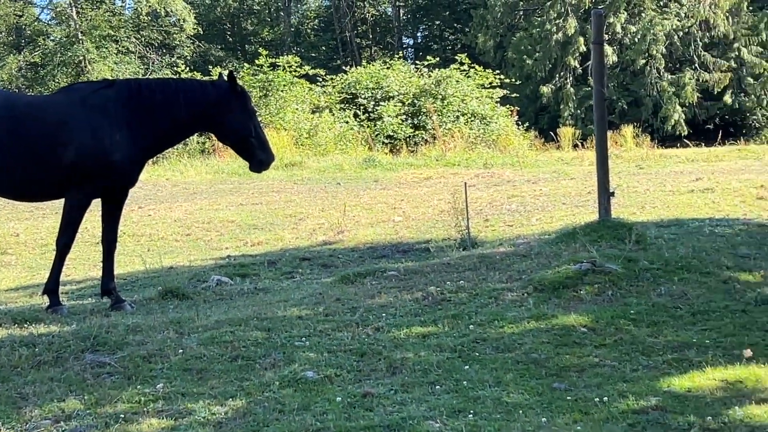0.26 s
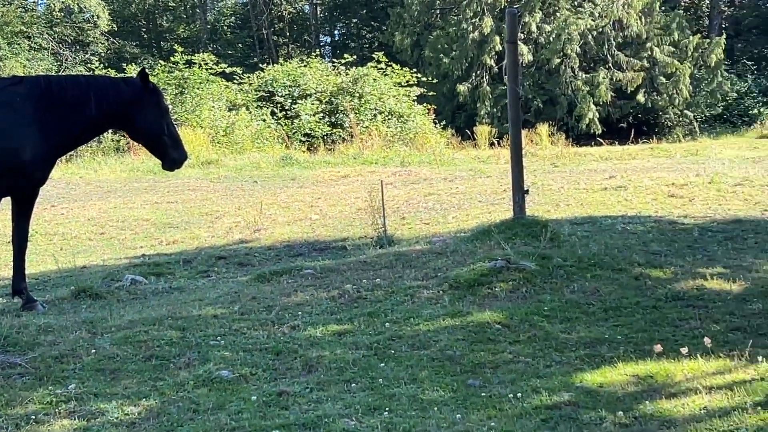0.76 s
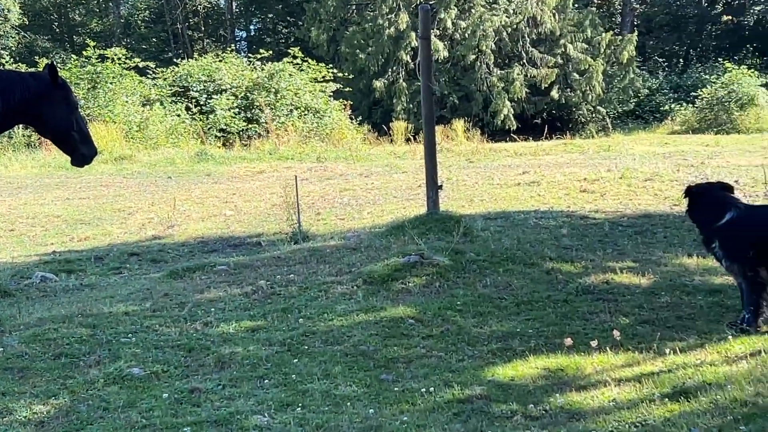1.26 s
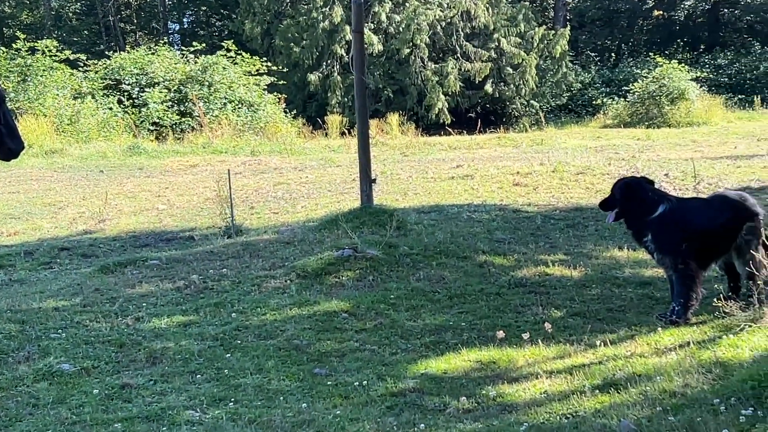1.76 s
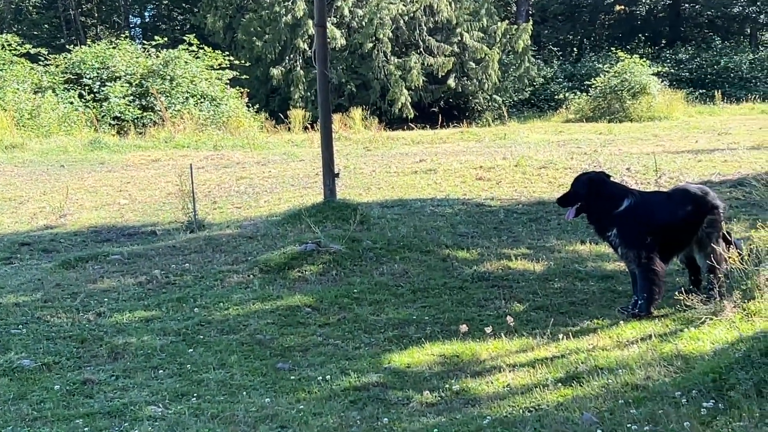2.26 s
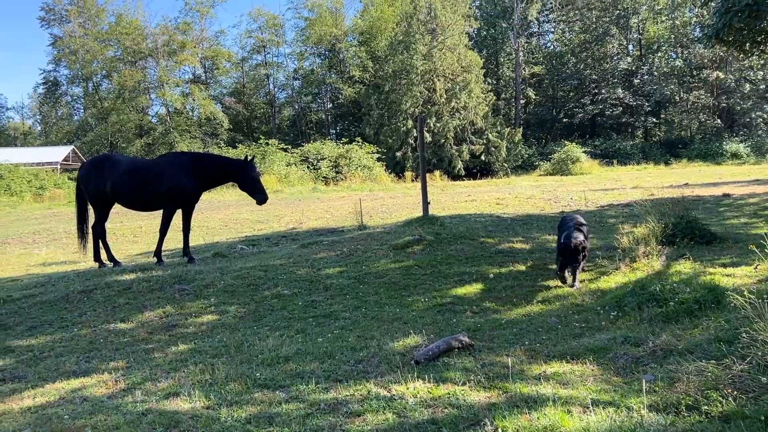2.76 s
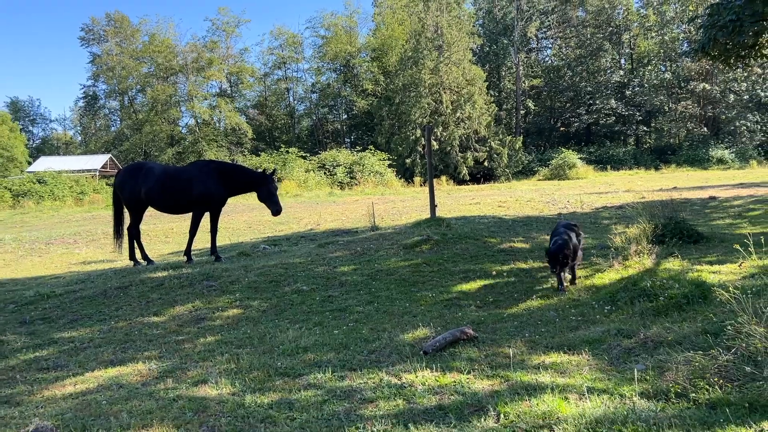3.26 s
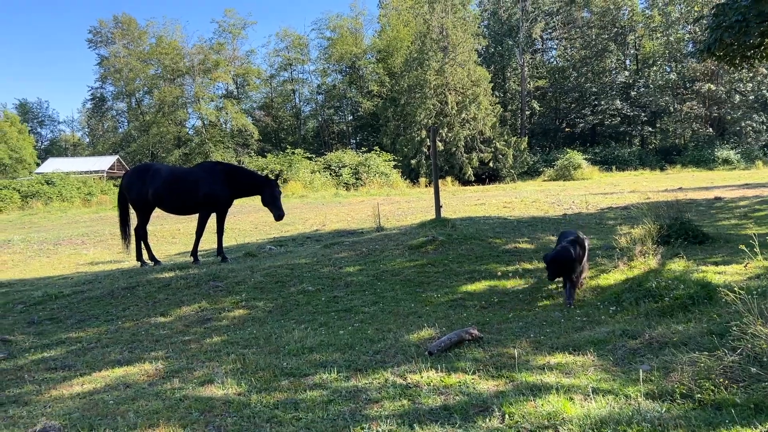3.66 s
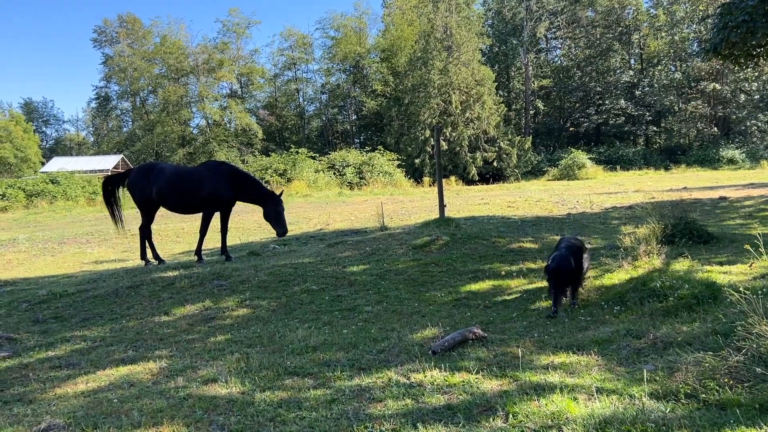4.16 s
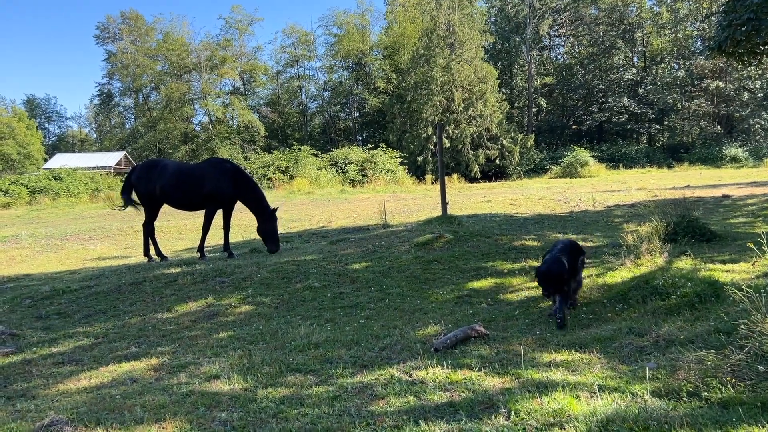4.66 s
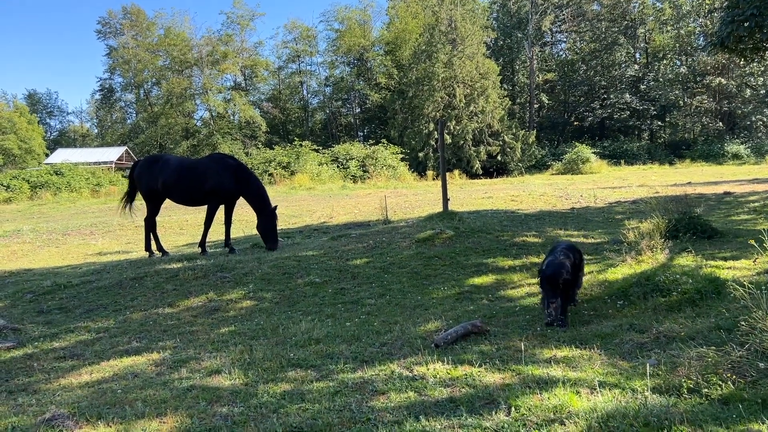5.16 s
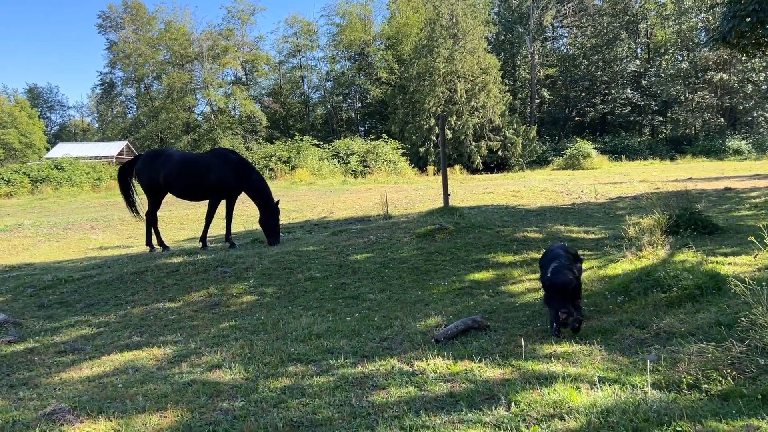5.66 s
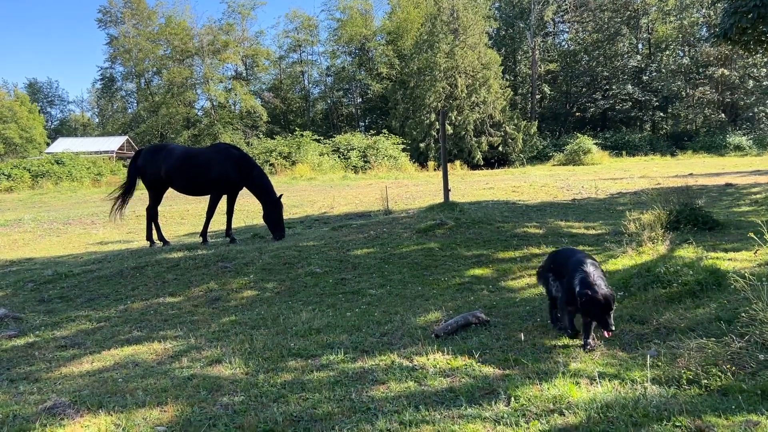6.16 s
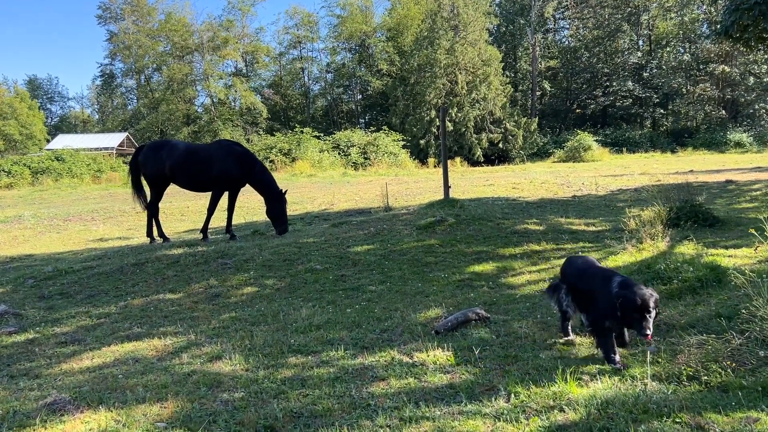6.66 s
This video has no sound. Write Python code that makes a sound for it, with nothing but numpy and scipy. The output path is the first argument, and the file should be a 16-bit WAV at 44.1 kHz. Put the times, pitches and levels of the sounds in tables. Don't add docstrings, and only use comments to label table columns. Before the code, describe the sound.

Steady low traffic rumble dominates a calm field, under thin airy hiss from leaves. Faint bird notes come and go among the trees, lightly echoing. Two or three muffled ground thumps fall near two seconds, stopping with a small click as the scene changes. Faint grass rustles follow, then a clearer buzzing chirp at five seconds, another soft thud, and last a breathy, wet, flapping horse snort, much louder and closer.

```python
import sys
import numpy as np
from scipy import signal
from scipy.fft import rfft, irfft, next_fast_len
from scipy.io import wavfile
from scipy.ndimage import uniform_filter1d, map_coordinates

SR = 44100
rng = np.random.default_rng(int(sys.argv[2]) if len(sys.argv) > 2 else 0)


def invert_db(level):
    return 10 ** (np.asarray(level, dtype=float) / 20)


def output_pcm(signal):
    pcm = np.clip(np.atleast_2d(signal).T, -1, 1) * 32767
    wavfile.write(sys.argv[1], SR, np.round(pcm).astype(np.int16))


N = 303849
T = np.arange(N) / SR
SCENE_CHANGE = 102559
FLAP_HZ, FIRST_FLAP = 1 / .04215, 6.627 - 4 * .04215
# (time [s], length [s], centre [Hz], level [dB])
GRASS = [(.28, 0.064, 9000, -82), (1.01, 0.089, 12500, -79), (1.058, .03, 8000, -77),
         (3.01, .05, 12000, -84), (3.44, .04, 12000, -83), (3.627, .06, 13000, -80),
         (3.988, .06, 13000, -81), (3.11, 0.0068, 9800, -77), (0.036, .012, 950, -58),
         (4.5, .08, 12000, -84), (5.29, 0.074, 12800, -75), (5.883, .06, 12000, -82),
         (4.743, .03, 2300, -71.5), (5.018, 0.059, 2190, -70), (5.29, 0.072, 1790, -67),
         (5.576, 0.048, 2090, -73), (5.848, .03, 2500, -70), (6.107, 0.046, 1900, -72),
         (6.158, .006, 4100, -66), (6.203, 0.24, 11000, -85)]


def unit(x):
    return x / np.sqrt(np.mean(x ** 2) + 1e-20)


def along(points, hz):
    f, v = np.transpose(points)
    return np.interp(np.log(hz + 1), np.log(f + 1), v)


def curves(rows, at=T):
    s, *cols = np.transpose(rows)
    return [np.interp(at, s, c) for c in cols]


def wobble(rate, t=T):
    knots = rng.standard_normal(int(len(t) * rate / SR) + 4)
    return map_coordinates(knots, [(t - t[0]) * rate])


def filtered(x, response):
    m = next_fast_len(N + 8192)
    return irfft(rfft(x, m) * response(np.fft.rfftfreq(m, 1 / SR)), m)[..., :N]


def resonance(f, centre_hz, width_hz):
    return 1 / (1 + ((f - centre_hz) / width_hz * 2) ** 2)


def rush(mid_db, side_db, patchy_db, tie=0):
    z = signal.stft(rng.standard_normal((2, N)), nperseg=512)[2]
    field_noise = rng.standard_normal(z.shape[1:])
    patches = uniform_filter1d(uniform_filter1d(field_noise, 6, 0), 14, 1)
    z[1] = tie * z[0] + np.sqrt(max(1 - abs(tie) ** 2, 0)) * z[1]
    pair = signal.istft(z * invert_db(patchy_db * unit(patches)), nperseg=512)[1][:, :N]
    mid, side = filtered(pair, lambda hz: invert_db(np.array([mid_db(hz), side_db(hz)])))
    return np.array([mid + side, mid - side]) / np.std(mid)


def tone(hz):
    return 2 * np.pi * np.cumsum(hz) / SR


def window(start, length, t=T):
    return np.sqrt(np.sin(np.pi * np.clip((t - start) / length, 0, 1)).clip(0))


def field():
    # (time [s], level [dB])
    traffic = [(0, -48), (.3, -45), (1.05, -44), (1.9, -46.5), (2.25, -45), (2.76, -50), (3.24, -46.5),
               (3.69, -48), (4.2, -48), (5.06, -47.5), (5.33, -43.5), (5.7, -47.5), (6.18, -46),
               (6.5, -48.5)]
    # (time [s], level [dB])
    breeze = [(0, -81), (1, -81), (1.5, -82.5), (2.5, -84), (2.9, -82), (3.6, -75.5), (4.3, -77),
              (6.5, -75)]
    # (frequency [Hz], density [dB per Hz])
    rumble_spectrum = [(12, -48), (20, -20.5), (32, -12.5), (54, 2.5), (113, -6), (136, -13), (156, -16.5),
                       (188, -20), (320, -32.5), (420, -38), (700, -120)]
    # (frequency [Hz], density [dB per Hz])
    road_spectrum = [(88, -34), (150, -0.5), (233, -2.5), (326, -6), (362, -3.5), (660, -7), (939, 0),
                     (1170, -8.5), (1570, -11.5), (3080, -25.5), (3730, -28), (5000, -36), (6500, -75),
                     (11000, -120)]
    # (frequency [Hz], density [dB per Hz])
    leaves_mid = [(1760, -31), (3000, 3), (3130, 0.5), (3930, -4.5), (4360, -3), (5250, -3), (8110, -9),
                  (9380, -17), (9840, -15), (10100, -52), (10900, -17), (13600, -13.5), (15200, -22),
                  (15600, -36)]
    leaves_side = [(1760, -9), (3000, -3), (4210, -4), (4800, -4), (5140, -3.5), (7940, -10.5), (8110, -17),
                   (8690, -13), (10900, -15), (12600, -16), (13200, -29), (14000, -17), (14900, -21),
                   (15600, -19)]
    # (frequency [Hz], side minus mid [dB])
    field_side = [(30, -15), (60, -19), (110, -16), (200, -12.5), (380, -7), (700, -3.5), (1300, -4),
                  (3000, -2.5)]

    def wide(points):
        return lambda f: along(points, f), lambda f: along(points, f) + along(field_side, f)

    (rumble_db,), (leaves_db,) = curves(traffic), curves(breeze)
    road_db = -58.5 + .1 * (rumble_db - rumble_db.mean())
    stir = sum(np.exp(-((T - s) / .12) ** 2) for s, _, hz, _ in GRASS if hz > 7000)
    fizz_db = -89.5 + .2 * (leaves_db - leaves_db.mean()) + 2 * np.tanh(stir)
    rumble = invert_db(rumble_db + 2.5 + 2.1 * wobble(7)) * rush(*wide(rumble_spectrum), patchy_db=0)
    hum = rush(*wide(road_spectrum), patchy_db=0.96, tie=.45j)
    road = invert_db(road_db + 2 + 0.84 * wobble(3.24)) * hum
    hiss = rush(lambda f: along(leaves_mid, f), lambda f: along(leaves_side, f) + .6, patchy_db=1.55)
    high = filtered(hiss, lambda f: f > 10000)
    leaves = invert_db(leaves_db + 4 + 0.71 * wobble(12)) * (hiss - high)
    fizz = invert_db(fizz_db + 15 + 0.74 * wobble(12)) * high
    return rumble + road + leaves + fizz


def trees(x):
    t60 = 0.75
    t = T[:SR]
    tail = rng.standard_normal((2, SR)) * invert_db(-60 * t / t60) * np.clip(t / 0.064, 0, 1)
    return signal.fftconvolve(np.atleast_2d(x), tail / np.linalg.norm(tail[0]), axes=1)[:, :N]


def thuds():
    # (time [s], peak [dB], frequency signed by first swing [Hz], decay by 60 dB [s])
    blows = [(2.1208, -26.5, 111, 0.083), (2.1327, -26.5, -69, 0.26), (2.3108, -28.5, 83, 0.53),
             (6.12, -28, 102, 0.071)]
    out = np.zeros(N)
    for s, db, hz, t60 in blows:
        t = (T - s).clip(0)
        heard = (np.arange(N) <= SCENE_CHANGE) | (s * SR > SCENE_CHANGE)
        out += invert_db(db - 60 * t / t60) * np.sin(2 * np.pi * hz * t) * heard
    return filtered(out, lambda f: 1 / (1 + (f / 13500) ** 12))


def ground():
    out = np.zeros((2, N))
    both, each = rng.standard_normal(N), rng.standard_normal((2, N))
    sputter = invert_db(3.8 * wobble(300))
    for s, length, hz, db in GRASS:
        band = signal.butter(2, [hz * 0.71, hz * 1.18], "band", fs=SR)
        spread = hz / 6000
        noise = (both + each * spread) / np.hypot(1, spread)
        rustle = signal.lfilter(*band, noise * sputter * window(s, length))
        out += invert_db(db + 11.0) * np.sqrt(8000 / hz) * rustle
    return out


def buzzing(rows, beak_hz, above, below):
    carrier, buzz, db = curves(rows)
    beak = np.minimum(np.maximum.accumulate(carrier), beak_hz)
    comb = 0
    for k in range(-3, 5):
        line = carrier + k * buzz
        reach = np.where(line > beak, above, below)
        gain = np.exp(-((line - beak) / reach / buzz) ** 2) * invert_db(1.8 * wobble(40))
        comb = comb + gain * np.sin(tone(line + 26 * wobble(90)) + 1.1 * k * k)
    return invert_db(db) * (T > rows[0][0]) * (T < rows[-1][0]) * comb


def trills():
    # (time [s], length [s], level [dB], sweep [Hz])
    runs = [(0.268, .19, -67, 350), (2.442, .25, -73, 170)]
    out = np.zeros((2, N))
    turn = 88 * T % 1
    for s, length, db, sweep_hz in runs:
        progress = (T - s).clip(0, length) / length
        hz = 3200 + 170 * progress + sweep_hz * (2 * turn - 1)
        flutter = 3.7 * np.array([wobble(150), wobble(150)])
        pulses = window(s, length) * np.sqrt(np.sin(np.pi * turn).clip(0))
        out += invert_db(db + 8 - 5 * progress + flutter) * pulses * np.sin(tone(hz + 90 * wobble(300)))
    return out


def far_birds():
    # (time [s], carrier [Hz], buzz [Hz], level [dB])
    rival = [(3.748, 4260, 270, -80), (3.76, 4300, 265, -63), (3.8, 4420, 225, -64.5),
             (3.86, 4480, 205, -65.5), (3.94, 4650, 175, -71), (4.03, 4640, 170, -77),
             (4.2, 4600, 165, -86)]
    # (time [s], length [s], start [Hz], end [Hz], level [dB])
    glides = [(-.1, 0.36, 4730, 4600, -71.5), (1.079, 0.16, 4150, 4000, -81), (2.29, .035, 5100, 6000, -76),
              (2.35, .079, 7000, 6900, -79), (3.22, .7, 6930, 6830, -83), (3.498, 0.044, 7300, 7900, -78)]
    # (time [s], length [s], start [Hz], end [Hz], level [dB])
    seep = [
        (2.762, 0.18, 6160, 6190, -86),
        (2.92, .19, 6150, 6000, -89.5),
    ]
    # (time [s], length [s], start [Hz], end [Hz], level [dB])
    double = [(0, .05, 4380, 4050, 0), (.04, .065, 4250, 3850, -3)]
    # (time [s], level [dB])
    chips = [(3.11, -74), (3.2, -75), (3.29, -74), (3.375, -71), (3.46, -74), (3.555, -72), (3.65, -79)]
    note_spread = 117
    notes = [(*row, 270) for row in glides] + [(*row, 22) for row in seep]
    notes += [(s, .03, 4080, 4400, db, note_spread) for s, db in chips]
    for k in range(4):
        for s, *glide, db in double:
            notes.append((.514 + k * .147 + s, *glide, -68 + db - k * 1.5, note_spread))
    out = buzzing(rival, beak_hz=4560, above=.95, below=1.05) * invert_db(np.array([[2.6], [-2.6]]))
    for s, length, start_hz, end_hz, db, spread in notes:
        span = slice(max(round(s * SR), 0), round((s + length) * SR))
        t = T[span]
        phase = tone(np.interp(t, [s, s + length], [start_hz, end_hz]))
        for ear in out:
            blur = 45 / spread + wobble(3.5 * spread, t)
            ear[span] += invert_db(db + 5) * window(s, length, t) * blur * np.sin(phase)
    return out + trills()


def near_bird():
    # (time [s], carrier [Hz], buzz [Hz], level [dB])
    buzz_call = [(5.035, 3350, 149, -66), (5.05, 3600, 148, -56), (5.068, 3975, 149.4, -47.5),
                 (5.14, 4056, 158.8, -48), (5.22, 3950, 155.6, -46.5), (5.3, 3875, 143.2, -51.5),
                 (5.4, 3660, 135, -59.5), (5.42, 3650, 136, -76.5)]
    # (time [s], frequency [Hz], level [dB])
    voice = [
        [(5.28, 3570, -65), (5.36, 3640, -61.5), (5.4, 3510, -59), (5.44, 3476, -55.5), (5.462, 3600, -61)],
        [(5.45, 3800, -60), (5.466, 3840, -54.5), (5.495, 3640, -70)],
        [(5.49, 3640, -70), (5.53, 3640, -63), (5.568, 3580, -61), (5.588, 3510, -55.5), (5.605, 3280, -66)],
    ]
    song = buzzing(buzz_call, beak_hz=3970, above=2.15, below=1.1)
    buzz = curves(buzz_call)[1]
    for rows in voice:
        hz, db = curves(rows)
        rough = 1 + .5 * (T < 5.45) * np.sin(tone(buzz))
        swell = window(rows[0][0], rows[-1][0] - rows[0][0])
        song += rough * invert_db(db + 5 + 1.6 * wobble(60)) * swell * np.sin(tone(hz))
    return song


def boom(boom_db, chest_db, slack):
    # (time [ms], frequency [Hz], level [dB])
    cavity = [(9, 262, -26), (16, 252, 0), (21.5, 240, -3), (24, 112, -6), (29, 212, 0), (33, 157, -3),
              (37, 105, -5), (45, 83, -8), (58, 70, -40)]
    # (time [ms], frequency [Hz], level [dB])
    chest = [(10, 100, -24), (18, 100, 0), (30, 85, 0), (42, 72, -2), (58, 68, -30)]
    octave = 0.14
    modes = ((cavity, 12, boom_db + 8, -1), (chest, 13.5, chest_db + 4, .6))
    out, ms = np.zeros(N + SR), np.arange(SR // 12) * 1000 / SR
    for s in FIRST_FLAP + np.arange(1, 11) / FLAP_HZ:
        at = round(s * SR)
        open_at = min(at + 900, N - 1)
        loose = slack[open_at]
        beat = 12 + (ms - 12) / loose
        for shape, crest_ms, level, shift in modes:
            hz, db = curves(shape, beat)
            db = db - 35 * (loose - 1) * np.clip((27 - beat) / 6, 0, 1)
            phase = tone(hz * loose ** shift)
            phase = phase - np.interp(crest_ms, beat, phase)
            wave = np.cos(phase) - octave * np.cos(2 * phase)
            out[at:][:len(ms)] += invert_db(level[open_at] + db) * wave
    return filtered(out[:N], lambda f: 1 / (1 + (52 / (f + 1)) ** 6))


def slit_whistle(hiss_db, ms, beating, slack, jet):
    # (time [ms], whistle [Hz], level [dB])
    slit = [(0, 760, -17), (5, 790, -9), (10.3, 860, -4), (11.3, 920, 1), (13.5, 940, -1), (15.5, 920, -10),
            (27, 860, -10), (31, 800, -24), (42, 760, -26)]
    leak_s, leak_db, leak_beats = 6.688, 7, 3
    leak = -np.cos(2 * np.pi * (T - leak_s) * FLAP_HZ / leak_beats).clip(0)
    whistle_db = hiss_db + 5.5 + leak_db * (T > leak_s - 1 / FLAP_HZ) * leak
    hz, db = curves(slit, ms)
    db = db - 60 * np.minimum(slack - 1, .1) * (ms < 10.5)
    pure = invert_db(1.2 * wobble(150)) * np.sin(tone(hz + 50 * wobble(120)))
    breath = unit(filtered(rng.standard_normal(N), lambda f: resonance(f, 870, 380)))
    whistle = invert_db(whistle_db + 9.0) * (beating * invert_db(db) * pure + invert_db(beating * jet - 10.5) * breath)
    gap = unit(filtered(rng.standard_normal(N), lambda f: resonance(f, 1390, 220)))
    return whistle + invert_db(hiss_db + 12 + beating * jet - 5 * (0.5 - beating)) * (slack - .95) * gap


def jet_hiss(hiss_db, beating, jet):
    # (centre [Hz], width [Hz], level [dB])
    formants = [(368, 270, 5), (1426, 160, -1.5), (1720, 190, -9.5), (2300, 125, -7), (3090, 110, -7),
                (4300, 600, -17.5), (5600, 450, -33), (6900, 1000, -13.5), (8100, 1300, -22),
                (11000, 2600, -22), (14100, 2100, -24.5)]
    # (frequency [Hz], side minus mid [dB])
    nose_side = [(350, -18), (600, -6), (1300, -10.5), (2400, -4.5), (4400, -0.5), (5500, 7), (7000, -8),
                 (9500, 4), (12000, 2), (15000, -8)]

    def nose(f):
        peaks = sum(invert_db(2 * d) * resonance(f, c, w) for c, w, d in formants)
        dips = sum(8 * np.exp(-((f - c) / 90) ** 2) for c in (620, 1190, 2010))
        return 10 * np.log10(peaks) - 20 * (f < 270) - dips

    level = invert_db(hiss_db + 6 + beating * jet - 5.8 * (1 - beating) + 2.1 * wobble(350))
    return level * rush(nose, lambda f: nose(f) + along(nose_side, f), patchy_db=-0.5, tie=.1 + .7j)


def flap_tick(ms):
    noise = rng.standard_normal((2, N))
    bright = filtered(noise, lambda f: 1 / (1 + (4500 / (f + 1)) ** 4))
    return invert_db(-30 + 3 * wobble(30) - 60 * ms / 2.9) * (T > 6.6) * bright


def snort():
    # (time [s], airflow [dB], flap swing [dB])
    blow = [(6.43, -72, -70), (6.47, -50.5, -60), (6.52, -39.5, -33), (6.6, -38, -32.5),
            (6.69, -37.5, -30.5), (6.775, -38, -27.5), (6.86, -39, -32), (6.89, -35.5, -34)]
    # (time [ms], level [dB])
    jet_beat = [(0, -15), (9.5, -14), (12, -4), (17, -2), (25, 0), (27, -1), (28.5, -13), (42, -15)]
    hiss_db, boom_db = curves(blow)
    loose = np.exp(-(T - 6.522).clip(0) / .022)
    slack = 1.02 + .33 * loose
    skipped = abs(T - 6.563) < .5 / FLAP_HZ
    chest_db = -31.5 + 5.5 * loose - 10 * skipped
    ms = (T - FIRST_FLAP) * FLAP_HZ % 1 * 1000 / FLAP_HZ
    beating = np.clip((T - 6.475) / 0.095, 0, 1)
    on = np.clip((T - blow[0][0]) / .02, 0, 1)
    jet = curves(jet_beat, 12 + (ms - 12) / slack)[0]
    whistle = slit_whistle(hiss_db, ms, beating, slack, jet)
    hiss = jet_hiss(hiss_db, beating, jet)
    near = boom(boom_db, chest_db, slack) + on * whistle
    late = np.pad(near, (5, 0))[:N]
    return np.array([near, late]) + (on * hiss + flap_tick(ms)) * invert_db(np.array([[1.], [-1.]]))


def mid_dip(x):
    mid, side = (x[0] + x[1]) / 2, (x[0] - x[1]) / 2
    mid = filtered(mid, lambda f: invert_db(-16 * np.exp(-((f - 9900) / 650) ** 2)) / (1 + (f / 15300) ** 30))
    return np.array([mid + side, mid - side])


def scene():
    horse, bird, far = snort(), near_bird(), far_birds()
    echo = trees(invert_db(-10.5) * bird + invert_db(-7.5) * far + invert_db(-19) * horse)
    bird_pair = bird * invert_db(np.array([[-1.8], [1.8]]))
    return mid_dip(horse + ground()) + bird_pair + far + echo + thuds() + field()


def top_cut(x):
    return signal.sosfilt(signal.butter(12, 15780, fs=SR, output="sos"), x)


def record(dry):
    dry = dry / (1 + np.abs(dry / .26) ** 4) ** .25
    mid, side = (dry[0] + dry[1]) / 2, (dry[0] - dry[1]) / 2
    side = filtered(side, lambda f: invert_db(-10 * np.exp(-((f - 13500) / 1050) ** 4)))
    band = filtered(side, lambda f: (f > 1950) & (f < 8300))
    flicker = filtered(side, lambda f: (f > 2850) & (f < 4000))
    band = band - flicker * (wobble(40) > .45)
    side = side - band * (1 - invert_db(-24)) * (np.arange(N) < SCENE_CHANGE)
    return top_cut(np.array([mid + side, mid - side]))


dry = scene()
out = record(dry)
output_pcm(out)
```